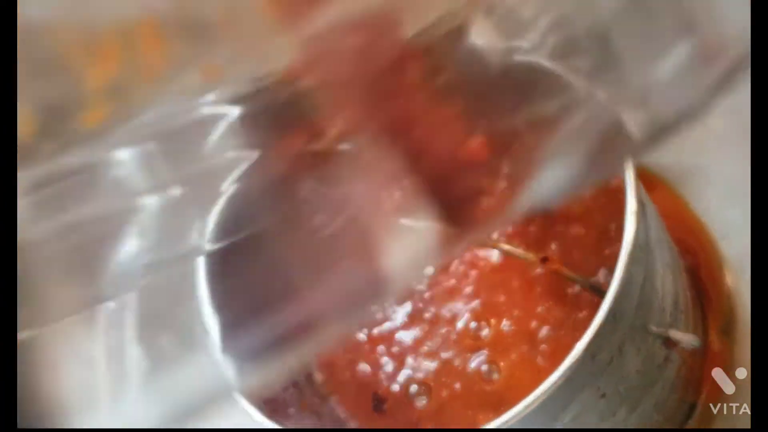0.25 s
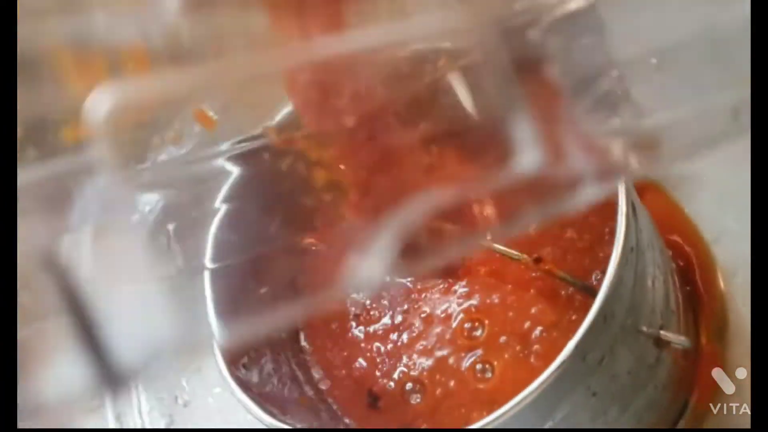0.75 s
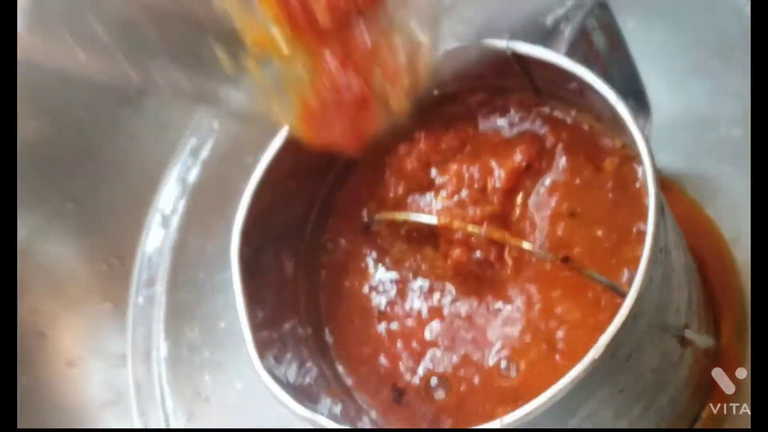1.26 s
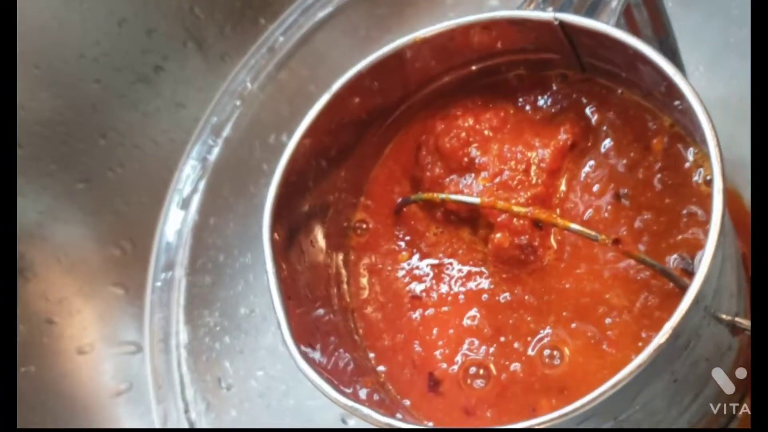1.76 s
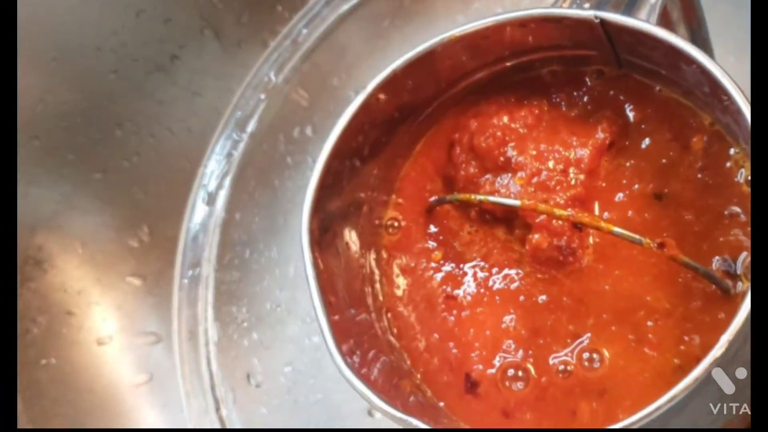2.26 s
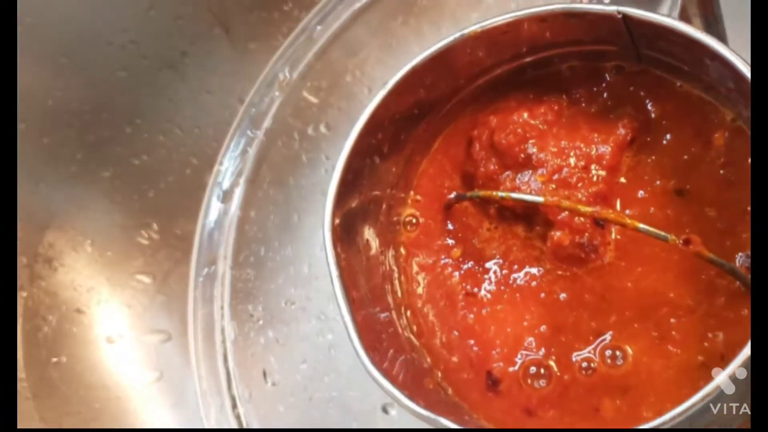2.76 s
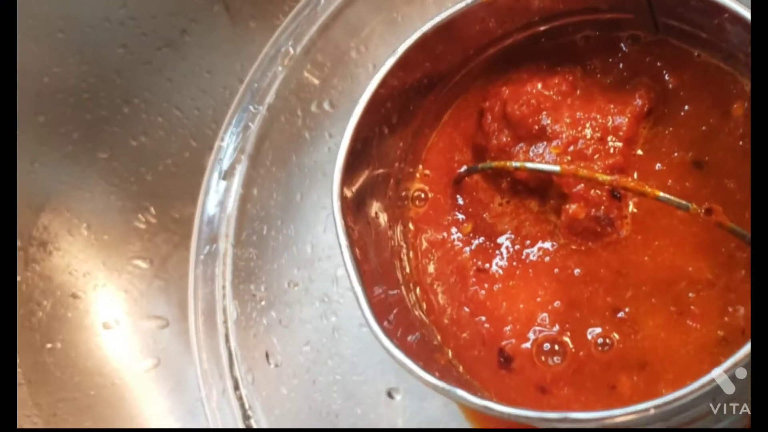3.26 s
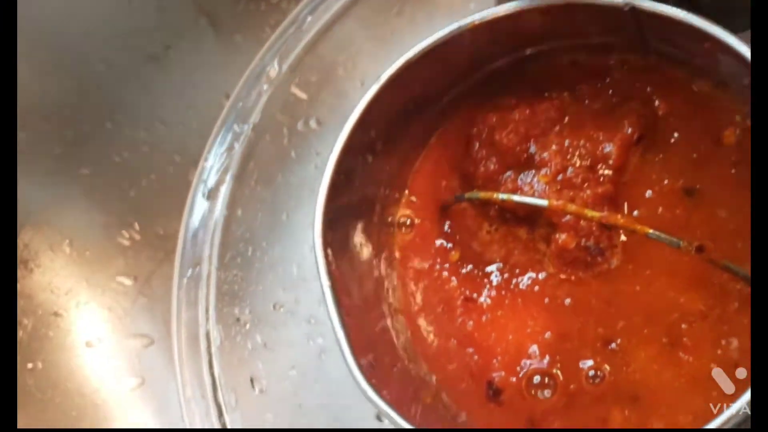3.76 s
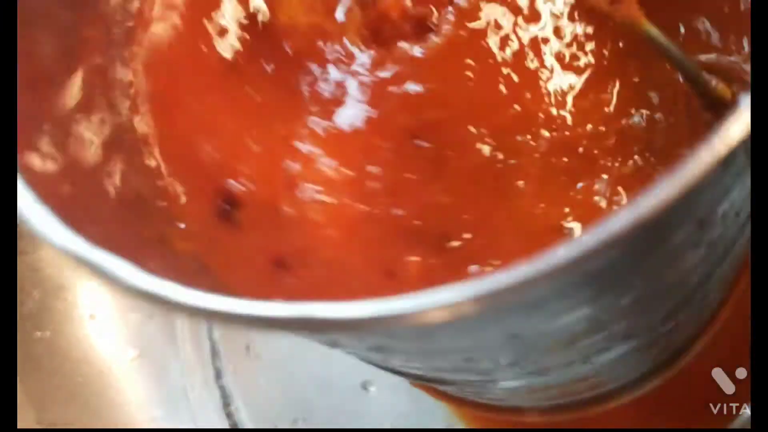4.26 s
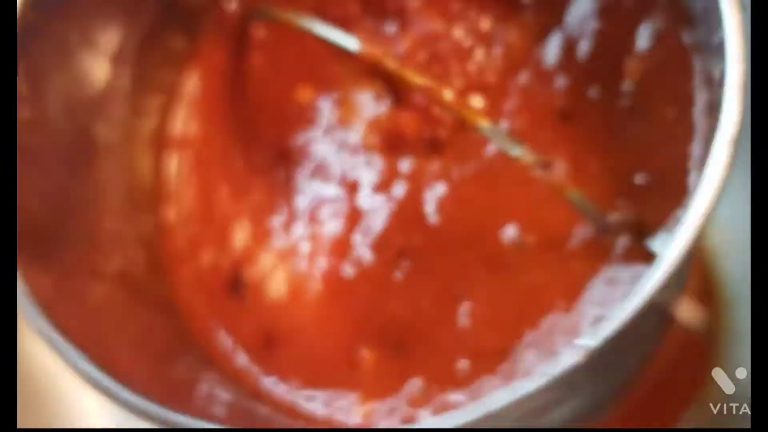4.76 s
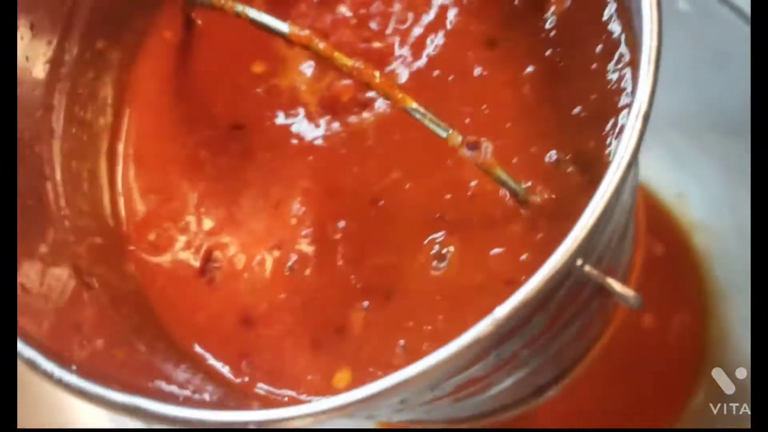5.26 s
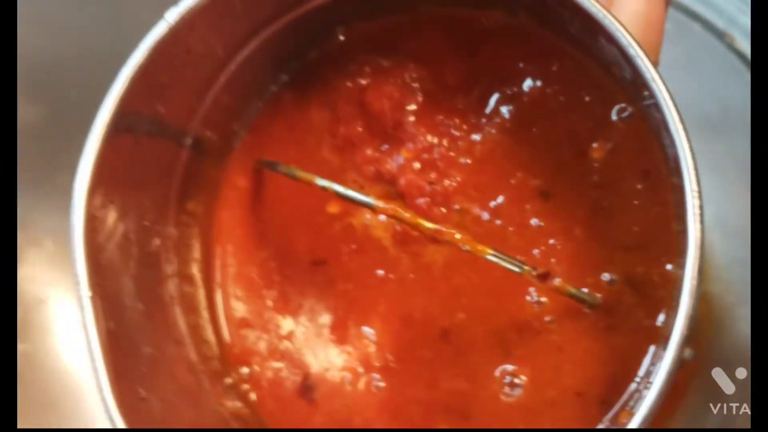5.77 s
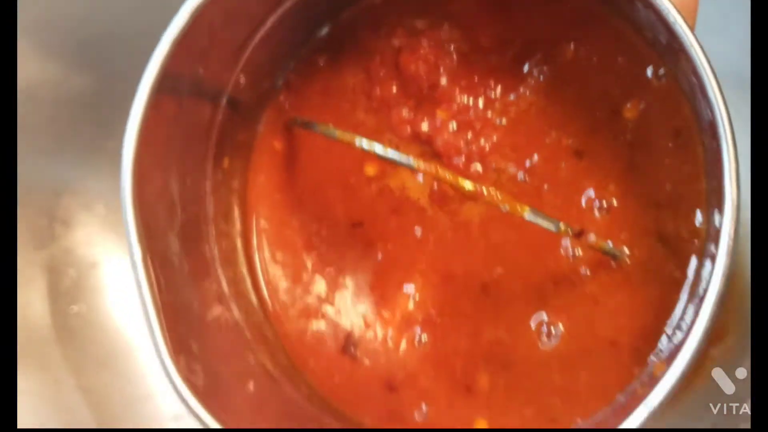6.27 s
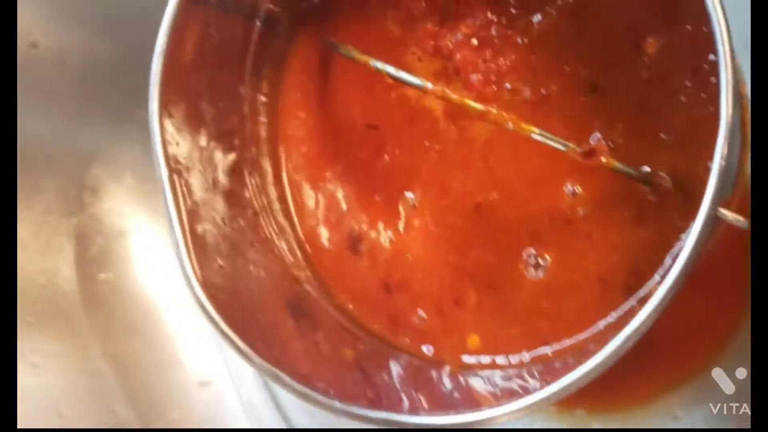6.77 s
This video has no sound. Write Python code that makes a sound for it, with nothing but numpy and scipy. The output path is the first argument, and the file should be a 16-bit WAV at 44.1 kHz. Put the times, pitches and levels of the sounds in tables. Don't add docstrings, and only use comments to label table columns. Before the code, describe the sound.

In a humming kitchen, lumps of puree slosh, a jar bangs and rocks in a steel sink, then a lifted sifter clinks and drips.

```python
import sys
import numpy as np
from scipy import signal
from scipy.fft import rfft, irfft
from scipy.io import wavfile
from scipy.ndimage import uniform_filter1d

SR = 44100
rng = np.random.default_rng(int(sys.argv[2]) if len(sys.argv) > 2 else 0)


def elevation(decibels):
    levels = np.asarray(decibels, float)
    return 10 ** (levels / 20)


def persist_wave(psi):
    counts = np.round(np.clip(psi, -1, 1) * 32767).astype(np.int16)
    wavfile.write(sys.argv[1], SR, np.atleast_2d(counts).T)


N = 309449


def evened(x):
    return x / np.sqrt(np.mean(x ** 2) + 1e-20)


def smooth_noise(shape, size):
    return evened(uniform_filter1d(rng.standard_normal(shape), size=size))


def read(points, hz):
    f, value = np.transpose(points)
    return np.interp(np.log(hz + 1), np.log(f + 1), value)


def add(mix, s, sound):
    part = mix[..., round(s * SR):][..., :sound.shape[-1]]
    part += sound[..., :part.shape[-1]]


def coloured(x, points):
    gain = elevation(read(points, np.fft.rfftfreq(x.shape[-1], 1 / SR)))
    return irfft(rfft(x) * gain, x.shape[-1])


def ring(hz, t60, rise, size):
    t = np.arange(size) / SR
    fade = elevation(-60 * t / max(t60, .004))
    return np.sin(2 * np.pi * hz * t) * fade * (1 - np.exp(-t / rise))


def wander(per_s):
    t = np.arange(0, N + 256, 256) / SR
    rates = np.geomspace(.3, 1, num=12) * per_s
    slow = sum(np.sin(2 * np.pi * (f * t + rng.random())) / np.sqrt(f) for f in rates)
    return evened(np.interp(np.arange(N) / SR, t, slow))


def patches(shape, size):
    over_pitch = uniform_filter1d(rng.standard_normal(shape), size=5, axis=0)
    return evened(uniform_filter1d(over_pitch, size=size, axis=1))


def mottled(x, patchy_db):
    z = signal.stft(x, nperseg=256, noverlap=192)[2]
    z = z * elevation(patchy_db * patches(z.shape, size=12))
    return signal.istft(z, nperseg=256, noverlap=192)[1][:N]


# f/Hz, likeness [0 to 1]
PORT_LIKENESS = [(60, 0.98), (130, 0.99), (290, 0.93), (640, 0.61), (1410, 0.048), (3100, 0.035),
                 (6820, 0.1), (15000, 0.61)]
# f/Hz, level/dB
PORT_LEAN = [(60, 1.5), (180, -0.2), (550, -0.8), (1650, 0.35), (4970, -0.1), (15000, 3)]


def ports(x):
    hz, _, z = signal.stft(x, SR, nperseg=256, noverlap=192)
    same = np.clip(read(PORT_LIKENESS, hz), 0, 1)[:, None]
    lean = elevation(read(PORT_LEAN, hz) / 2)[:, None]
    scatter = 1.36 * np.tanh(2.4 * patches(z.shape, size=30))
    side = 1j * np.sqrt((1 - same) / (1 + same)) * scatter
    both = z * np.array([lean * (1 + side), (1 - side) / lean])
    return signal.istft(both, nperseg=256, noverlap=192)[1][:, :N]


def diffuse(colour_db, patchy_db, size=2048):
    frames, hz = 4 * N // size + 5, np.fft.rfftfreq(size, 1 / SR)
    a, b, c, d, drift = rng.standard_normal((frames, len(hz), 5)).T
    drift = evened(uniform_filter1d(uniform_filter1d(drift, size=9, axis=0), size=8, axis=1))
    same = np.clip(read(PORT_LIKENESS, hz), 0, 1)[:, None]
    left = a + 1j * b
    right = same * left + np.sqrt(1 - same ** 2) * (c + 1j * d)
    z = np.array([left * elevation(read(PORT_LEAN, hz))[:, None], right])
    z = z * elevation(colour_db(hz)[:, None] + patchy_db * drift)
    return evened(signal.istft(z, nperseg=size, noverlap=3 * size // 4)[1][:, :N])


# f/Hz, t60/s
ECHO_TIMES = [(100, 0.13), (1000, 0.45), (4000, 0.16), (12000, 0.13)]


def room(x):
    taps = np.zeros((2, SR // 2))
    at = np.arange(100, SR // 2 - 20, 20)
    at = at + rng.integers(0, 20, (2, len(at)))
    np.put_along_axis(taps, at, rng.choice([-1., 1.], at.shape), 1)
    hz, t, z = signal.stft(taps, SR, nperseg=256)
    tail = signal.istft(z * elevation(-60 * t / read(ECHO_TIMES, hz)[:, None]), SR, nperseg=256)[1]
    return signal.fftconvolve(x[None], tail / np.linalg.norm(tail[0]), axes=1)[:, :N]


# t/s, level/dB
DRONE_LEVEL = [(0, -38.5), (.92, -40.5), (1.64, -43), (2.7, -42), (3.62, -45.5), (4.1, -45), (5.02, -45),
               (5.6, -41.5), (6.2, -39), (6.75, -37), (7.02, -38.5)]


def drone_level():
    return np.interp(np.arange(N) / SR, *np.transpose(DRONE_LEVEL))


# f/Hz, level/dB
DRONE_COLOUR = [(15, -42), (25, -18), (40, -40), (58, -7.5), (124, -4), (188, -5.5), (237, -5),
                (392, -13.5), (429, -2), (579, -7), (649, -8), (1410, -16), (2040, -15.5), (2400, -24.5),
                (6000, -36), (7800, -33), (13200, -120)]
# f/Hz, width/Hz, level/dB
ROOM_PEAKS = [(58.3, 26.6, 11.5), (136.6, 50, 7.5), (235.4, 13, 8), (363, 120, -0.5), (437.4, 21.3, 8),
              (499.2, 11, 5.5), (657, 61, 6), (825, 180, -7.5), (972, 380, 5.5), (1290, 27, -6),
              (1499, 30, 6.5)]


def drone(level_db, swell_db):
    t = np.arange(N) / SR

    def colour_db(hz):
        humps = sum(db / (1 + (2 * (hz - f) / width) ** 2) for f, width, db in ROOM_PEAKS)
        return read(DRONE_COLOUR, hz) + humps

    noise = diffuse(colour_db, patchy_db=1.5)
    rumble = signal.sosfiltfilt(signal.butter(2, 160, fs=SR, output="sos"), noise)
    middle = signal.sosfiltfilt(signal.butter(2, [600, 950], "band", fs=SR, output="sos"), noise)
    rumble_db = -0.7 + 0.11 * swell_db + 0.4 * wander(2.2)
    middle_db = -1.0 - 0.23 * swell_db
    out = elevation(level_db) * (noise + (elevation(rumble_db) - 1) * rumble + (elevation(middle_db) - 1) * middle)
    deep = signal.sosfiltfilt(signal.butter(3, 51.6, fs=SR, output="sos"), out)
    deep_db = -7 + 2.5 * abs(t - 1.6)
    return out + (elevation(deep_db) - 1) * deep


# f/Hz, level/dB
HISS_COLOUR = [(1470, -23), (2500, 3.5), (3800, -1), (4140, 1.5), (7030, -11.5), (12300, -8.5),
               (14500, -9.5), (16100, -15), (16500, -42)]


def hiss(swell_db):
    level_db = -56.5 + 0.47 * swell_db + 0.46 * wander(1.99)
    return elevation(level_db) * diffuse(lambda hz: read(HISS_COLOUR, hz), patchy_db=3.0, size=1024)


# f/Hz, width/Hz, level/dB
APPLIANCE = (670, 250, -59)


def appliance():
    centre_hz, width_hz, db = APPLIANCE
    level_db = db + 4.5 - 1.3 * np.arange(N) / SR

    def colour_db(hz):
        return -30 * np.log10(1 + (2 * (hz - centre_hz) / width_hz) ** 2)

    return elevation(level_db) * diffuse(colour_db, patchy_db=3.0)


# f/Hz, level/dB
MOTOR_TONES = [(2005, -60.5), (2490, -74.5), (4000, -84)]


def whine():
    out = np.zeros((2, N))
    for hz, db in MOTOR_TONES:
        drift, swell = smooth_noise((1, N), 2500)[0], smooth_noise((1, N), 2500)[0]
        turn = 2 * np.pi * np.cumsum(hz * (1 + 0.0006 * drift)) / SR
        out += elevation(db + 3.5 + 2.5 * swell) * np.sin(turn + np.array([[0], [1.4]]))
    return out


def kitchen():
    level_db = drone_level()
    swell_db = level_db - level_db.mean()
    return drone(level_db, swell_db) + hiss(swell_db) + appliance() + whine()


# t/s, body level/dB, body t60/s, fizz level/dB, fizz t60/s
LUMPS = [(0, -43.5, 0.68, -55.5, 1), (0.287, -62, .1, -51, 0.11), (0.3069, -43.5, 0.28, -39, 0.68),
         (.322, -59, 0.69, -43.5, 0.97), (0.41, -43, 0.21, -59, 0.21), (.526, -39, 0.064, -35, 0.035),
         (0.835, -54, 0.78, -37.5, 0.7), (0.91, -46, 0.95, -46.5, 0.3), (1.036, -39.5, 0.97, -42.5, 0.58),
         (1.065, -37.5, 0.47, -45.5, 0.56), (2.75, -40.5, 0.4, -49, 0.28), (2.829, -44, 0.7, -56, 0.5),
         (2.862, -27, 0.24, -40.5, 0.37), (2.906, -48, 0.18, -47, .25), (2.96, -37, 0.37, -45, 0.34),
         (3.6, -74, .5, -66, 1)]
# f/Hz, level/dB
BODY_COLOUR = [(180, -21), (300, -5), (364, -4.5), (441, -9.5), (605, -10), (684, -5.5), (1650, -10),
               (4620, -16), (8000, -37), (10400, -70), (17600, -120)]
FIZZ_COLOUR = [(2060, -3.5), (3500, -3.5), (4600, -1.5), (7570, -7), (8190, -19), (12300, -11),
               (15700, -18), (16200, -32), (16500, -46)]


def slosh():
    out, t = np.zeros(N), np.arange(20000) / SR
    top_hz, top_drain = 7000, 0.58
    for s, body_db, body_t60, fizz_db, fizz_t60 in LUMPS:
        noise = rng.standard_normal((2, len(t))) * elevation(0.7 * smooth_noise((2, len(t)), 120))
        body = evened(coloured(noise[0], BODY_COLOUR)) * elevation(body_db - 60 * t / body_t60)
        fizz = evened(coloured(noise[1], FIZZ_COLOUR))
        top = coloured(fizz, [(1.1 * top_hz, -40), (1.11 * top_hz, 0)])
        lower = (fizz - top) * elevation(fizz_db - 60 * t / fizz_t60)
        top = top * elevation(fizz_db + 7.0 - 60 * t / (top_drain * fizz_t60))
        add(out, s, body * (1 - np.exp(-t / 0.001)) + (lower + top) * (1 - np.exp(-t / 0.0018)))
    return out


# t/s, level/dB, f/Hz, length [cycles]
FINGER_BUMPS = [
    (.034, 1, 104, 1.93),
    (.4225, -14, 60, 2.3),
    (.275, -23, 51, 2.1),
]


def bumps():
    out = np.zeros((2, N))
    for s, db, hz, cycles in FINGER_BUMPS:
        u = np.arange(0, cycles, hz / SR)
        push = np.sin(2 * np.pi * u) * (u / cycles) * np.exp(1 - 2.75 * u) * np.e
        add(out, s, -elevation(db) * push * elevation([[0], [-20]]))
    return out


# t/s, level/dB, f/Hz, snap level/dB
DRIPS = [(1.231, -52, 2780, -50), (3.0354, -41, 2160, -53), (4.063, -57, 3030, -54),
         (4.078, -50, 2150, -53), (4.099, -49, 2720, -57), (4.141, -57, 2600, -55), (4.372, -45, 2780, -56),
         (4.501, -39.5, 2370, -58), (4.5604, -52, 2740, -62), (4.569, -34.5, 2810, -56),
         (4.714, -34, 2590, -62), (4.798, -44.5, 3840, -59), (5.0417, -54, 2570, -73),
         (5.09, -39.5, 3000, -56), (5.1406, -24, 2950, -56), (5.306, -42.5, 2690, -63),
         (5.3493, -37, 2890, -63), (6.591, -40, 2850, -87), (6.6027, -33, 2210, -65),
         (6.6716, -43, 2240, -59), (6.698, -41, 3050, -56), (6.704, -41, 2540, -61),
         (6.737, -48, 2470, -56)]
# t/s, level/dB, f/Hz, snap level/dB
TINKS = [(3.5602, -53, 4620, -57), (3.979, -48.5, 3950, -62), (4.371, -43, 4130, -57),
         (4.4806, -53, 4700, -55), (4.5214, -49, 4700, -50), (4.5265, -41.5, 4680, -47),
         (4.631, -34.5, 4600, -50), (4.658, -50, 5670, -46), (4.757, -49, 7300, -63),
         (4.897, -46, 5940, -59), (5.1414, -45, 4260, -66), (5.2456, -48, 6400, -66),
         (5.306, -47.5, 4470, -64), (6.018, -39.5, 7250, -71), (6.0268, -46, 7530, -70),
         (6.535, -54, 8400, -56), (6.7585, -56, 7200, -41.5)]
# t/s, level/dB
SNAPS = [(0.305, -41.5), (.8385, -61), (2.954, -40), (3.863, -50), (1.931, -50), (3.8042, -56),
         (3.8792, -34), (4.294, -50), (4.3037, -64), (4.364, -54), (4.596, -45.5), (4.6414, -57),
         (4.679, -53), (4.7786, -58), (4.8178, -56), (5.028, -56), (5.3354, -53.5), (6.798, -59)]


def tick_rows():
    def wall():
        return rng.uniform(2264, 3220)

    def rim():
        return rng.uniform(4150, 4700)

    drips = [(s, db, hz, rim(), db - 28, snap_db) for s, db, hz, snap_db in DRIPS]
    tinks = [(s, db - 11, wall(), hz, db, snap_db) for s, db, hz, snap_db in TINKS]
    snaps = [(s, db + 1, wall(), rim(), db - 17.5, db) for s, db in SNAPS]
    return drips + tinks + snaps


def ticks():
    out, t = np.zeros(N), np.arange(3000) / SR

    def pair(hz, apart, t60):
        step = 1 + 0.09 * apart
        first = ring(hz, t60, rise=0.0028, size=len(t))
        return first + 0.99 * ring(hz * step, 0.78 * t60, rise=0.00078, size=len(t))

    for s, wall_db, wall_hz, rim_hz, rim_db, snap_db in tick_rows():
        rough = 1 + 0.24 * smooth_noise((2, len(t)), 14)
        apart = rng.uniform(-0.85, 1, 2)
        wall = elevation(wall_db - 0.5) * rough[0] * pair(wall_hz, apart[0], 0.037)
        rim = elevation(rim_db + 5.0) * rough[1] * pair(rim_hz, apart[1], 0.035)
        colour = [(4000, -22), (7000, -10.0), (10500, -5 - 8 * abs(apart[0])), (12000, -2.5), (16000, -8.5)]
        snap = evened(coloured(rng.standard_normal(len(t)), colour))
        add(out, s, wall + rim + snap * elevation(snap_db + 5.0 - 60 * t / 0.048))
    return out


# t/s, level/dB
PRICKS = [(4.487, -52), (4.561, -48), (4.5935, -33), (4.6315, -44), (4.643, -52), (4.666, -50),
          (4.6815, -41), (4.69, -46), (4.775, -61), (4.781, -53), (6.699, -44), (6.707, -44), (6.721, -55),
          (6.738, -35), (6.756, -33), (2.9537, -29), (.8395, -56), (.307, -44), (.325, -44)]


def pricks():
    out, t = np.zeros(N), np.arange(3000) / SR
    for s, db in PRICKS:
        noise = rng.standard_normal(len(t))
        prick = evened(coloured(noise, [(8000, -30), (11000, -6), (12500, 4), (16000, -6)]))
        add(out, s, prick * elevation(db - 60 * t / 0.025))
    return out


# t/s, level/dB, f/Hz, t60/s
BLADE_HIT = (.335, -45, 7770, .5)


def blade():
    out = np.zeros(N)
    s, db, hz, t60 = BLADE_HIT
    uneven = 1 + .5 * smooth_noise(14000, 200)
    add(out, s, elevation(db) * ring(hz, t60, rise=0.0075, size=14000) * uneven)
    return out


# t/s, jar level at 1.2-2 kHz/dB, then against it
# level below/dB, level at 2-3 kHz/dB, level above with the treble noise/dB
CONTACTS = [(1.2929, -15, -17, -7, -9.5), (1.3102, -31.5, 1, -10, -10), (2.7455, -30, 0, -1, 2.5),
            (2.7496, -27.5, 1, -7, 1), (2.7606, -39.5, 12, 9.5, -8), (2.8583, -17, -2.5, -6, -5),
            (2.8618, -25, -1, -7, -3), (2.8654, -26, 8, -4, -8), (2.87, -28, 8, -6, -6),
            (2.876, -43, 3, -3, -3), (2.8975, -33, -2, -13, -2), (2.912, -29.5, 12, -27, -10),
            (2.953, -24, 5, -0.5, -18), (2.9994, -37.5, 15, -14, -11), (3.1263, -34.5, 3, -6, -9),
            (3.8772, -25.5, 3.5, -6.5, -14)]
# f/Hz, level/dB, t60/s
JAR_MODES = [(488, -5, 0.13), (717, 7, 0.023), (1015, -6, 0.072), (1425, 5, 0.017), (1515, 6.5, 0.026),
             (1608, -2.5, 0.03), (1800, 1, 0.027), (2240, 11, 0.0085), (2480, 10.5, 0.014),
             (2850, 1.5, 0.025), (3206, 1, 0.038), (3805, 0.5, 0.035), (4070, 1.5, 0.035), (4700, 0, 0.045),
             (4700, -28, 0.032)]


def cracks():
    out, t = np.zeros(N), np.arange(6000) / SR
    for s, db, low_db, upper_db, high_db in CONTACTS:
        groups_db = low_db, 0, upper_db, high_db
        modes = np.zeros(len(t))
        for hz, mode_db, t60 in JAR_MODES:
            a, b = rng.standard_normal(2)
            group = (hz > 1200) + (hz > 2000) + (hz > 3000)
            tone = ring(hz * (1 + 0.027 * b), t60, rise=0.001, size=len(t))
            late = int(0.0015 * SR * abs(a))
            modes += elevation(mode_db + groups_db[group] + 0.28 * a) * np.sign(b) * np.roll(tone, late)
        modes *= 1 + 0.57 * smooth_noise(len(t), 60)
        balance = [(200, low_db - 30), (450, low_db), (1000, low_db), (1450, -1.0), (1900, -4.0),
                   (2200, upper_db - 19.0), (2900, upper_db - 26.0),
                   (3300, high_db + 6.5), (5500, high_db - 4), (8000, high_db - 28)]
        contact = coloured(rng.standard_normal(len(t)), balance) * elevation(1.0 - 60 * t / 0.037)
        bright = [(4000, -38), (5500, -2.0), (9000, -6.0), (12000, -1.0), (16300, -1.5)]
        treble = evened(coloured(rng.standard_normal(len(t)), bright)) * elevation(high_db - 0.5 - 60 * t / 0.036)
        add(out, s, elevation(db) * (elevation(-6.0) * modes + contact + treble) * (1 - np.exp(-t / 0.0015)))
    return out


# t/s, level of the middle mode/dB, low modes against it/dB, high modes/dB, damping [factor]
BLOWS = [(1.2931, -11, -8, -39, 1.33), (1.314, -13.5, -7.5, -5.5, 2.6), (1.357, -39, 0.5, -9.5, 1.3),
         (1.394, -35.5, -5, -0.5, 1.03), (2.756, -25, 7.5, -12, 0.56), (2.857, -24, 18, 1, 2.2),
         (2.897, -29, 15, 0.5, 0.45), (2.954, -9, 1, -3.5, 0.94), (2.959, -28, 26.5, -2, 0.73),
         (3.025, -22, 11.5, -11, 0.99)]
# t/s, level/dB, damping [factor]
ROCKS = [
    (3.132, -19, 0.88),
    (3.198, -32, 0.55),
    (3.243, -22, 1),
    (3.304, -23.5, 1.9),
]
# f/Hz, t60/s
SINK_MODES = [(82, 0.22), (106, 0.079), (146, 0.19), (213, 0.17), (330, 0.35)]


def sink():
    out = np.zeros(N)
    rocks = [(s, db, -2, -16.5, damping) for s, db, damping in ROCKS]
    for s, db, low_db, high_db, damping in BLOWS + rocks:
        detune = 1 + .015 * rng.standard_normal(len(SINK_MODES))
        modes_db = low_db - 21.5, low_db - 5.5, 0, high_db, high_db - 21.0
        for (hz, t60), mode_db, d in zip(SINK_MODES, modes_db, detune):
            boom = ring(hz * d, t60 / damping, rise=0.0042, size=16000)
            add(out, s, -elevation(db + mode_db + 5.0) * boom)
    return out


# t/s, level/dB, f/Hz, t60/s
PINGS = [(1.2935, -35, 1620, .09), (1.2935, -18.5, 1850, 0.032), (2.9535, -11.5, 1520, 0.03),
         (2.9535, -14, 2340, 0.024), (2.955, -17, 2780, 0.019), (2.9545, -20, 1950, .02),
         (2.96, -30, 4700, .05), (2.762, -28, 2450, .05), (2.752, -27.5, 772, 0.072),
         (2.862, -22, 800, .06), (2.911, -24.5, 750, .1), (2.868, -30, 4100, .07),
         (5.142, -41, 4200, 0.089), (5.35, -41.5, 2800, 0.055), (4.576, -42.5, 3150, .08),
         (2.958, -26, 950, .04), (2.87, -23, 1020, 0.073), (6.021, -46, 2250, .04), (6.389, -45, 2700, .08),
         (6.389, -45.5, 3050, 0.093), (6.5915, -33, 3050, .09), (6.523, -45, 3050, .06),
         (5.349, -43, 4450, .05), (1.308, -30, 1600, .05), (2.965, -27, 620, .1), (2.982, -30, 1350, .06),
         (4.501, -43, 3000, .08), (4.64, -44, 3300, .05), (6.674, -41, 1640, 0.093), (6.7, -42, 4700, .04),
         (6.722, -46, 2900, 0.074), (6.735, -43, 1750, .08), (6.745, -46, 2050, .12)]


def pings():
    out = np.zeros(N)
    for s, db, hz, t60 in PINGS:
        rough = 1 + 0.46 * smooth_noise(5000, 60)
        add(out, s, elevation(db) * ring(hz, t60, rise=0.0012, size=5000) * rough)
    return out


# t/s, level/dB, f/Hz, t60/s
THRUMS = [
    (1.2938, -3.5, 81.6, .09),
    (1.357, -19, 167, .12),
    (1.373, -18, 90, .08),
    (2.954, -9, 80, 0.11),
    (5.927, -39, 428, .2),
    (6.086, -39, 431, .15),
    (6.187, -34.5, 439, 0.36),
    (6.275, -39, 433, 0.23),
    (6.319, -35.5, 430, .2),
]


def thrums():
    out = np.zeros(N)
    for s, db, hz, t60 in THRUMS:
        add(out, s, elevation(db) * ring(hz, t60, rise=1.1 / hz, size=12000))
    return out


# t/s, level/dB, centre f/Hz, t60/s
SMACKS = [(1.2945, -35, 4770, 0.047), (1.296, -37, 6400, 0.071), (2.8386, -42, 4240, .08),
          (2.886, -39, 4300, .04), (2.899, -32, 4400, .05), (2.9082, -29, 4720, .07),
          (2.9587, -31, 4700, .07), (2.9995, -31, 4500, 0.04), (3.001, -47, 6240, .03),
          (3.864, -39, 4250, 0.039), (3.9368, -41, 3210, 0.06), (3.9517, -47, 3850, 0.069),
          (4.063, -46, 3370, 0.05), (4.078, -47, 6550, .06), (4.1, -37.5, 3700, 0.034),
          (4.1425, -37, 3260, .035), (4.215, -45, 3580, 0.074), (4.295, -51, 7000, .07),
          (4.523, -39, 5950, 0.061), (4.572, -35, 5300, 0.031), (4.658, -46, 5770, .04),
          (4.756, -49, 7000, .06), (4.7555, -43, 5000, 0.056), (5.04, -40, 1890, 0.046),
          (5.04, -46, 4200, .03), (5.135, -46, 4650, .04), (5.141, -46, 2520, .03), (5.159, -44, 2910, .05),
          (5.207, -45, 6450, .03), (5.349, -48, 4420, .04), (5.35, -42, 3200, .04), (4.574, -42, 3160, .05),
          (4.718, -45, 3170, .05), (2.9546, -30, 2650, 0.038), (6.021, -49, 7500, 0.042),
          (6.543, -48, 8500, .03), (6.595, -47, 3030, .09), (6.021, -39, 530, 0.052),
          (6.6723, -40, 1610, 0.04), (6.7, -48, 2000, 0.045), (6.7005, -40, 4530, 0.036),
          (6.72, -44, 3040, 0.055), (6.7595, -41, 7000, 0.046), (6.797, -40.5, 8100, 0.045)]


def smacks():
    out, t = np.zeros(N), np.arange(3000) / SR
    for s, db, hz, t60 in SMACKS:
        pole = np.exp(-2 * np.pi * 0.093 * hz / SR)
        slow = signal.lfilter([1], [1, -pole], rng.standard_normal((2, len(t))))
        puff = evened(slow[0] * np.cos(2 * np.pi * hz * t) + slow[1] * np.sin(2 * np.pi * hz * t))
        add(out, s, puff * elevation(db - 5.5 - 60 * t / t60) * (1 - np.exp(-t / 0.00095)))
    return out


# start t/s, end t/s, level/dB
SEEPS = [
    (2.76, 2.955, -54),
    (2.95, 3.042, -50),
    (4.48, 4.748, -49.5),
    (6.665, 6.77, -44.5),
]


def seep():
    out, t = np.zeros(N), np.arange(N) / SR
    level = sum(elevation(db) * (t > a) * (t < b) for a, b, db in SEEPS)
    pops = rng.random(N) < 400 / SR
    size = level * elevation(2.0 * np.minimum(rng.exponential(1, N), 2.5)) * pops
    kind = rng.integers(0, 12, N)
    for k, hz in enumerate(np.geomspace(1500, 6500, num=12)):
        pop = ring(hz, 16 / hz, rise=0.00041, size=1200)
        out += signal.oaconvolve(size * (kind == k), pop)[:N]
    return out


# start t/s, end t/s, level/dB, f/Hz
SPRAY = (3.58, 4, -63, 13300)


def spray():
    a, b, db, hz = SPRAY
    band = [(.8 * hz, -40), (0.88 * hz, 0), (1.1 * hz, 0), (1.2 * hz, -30)]
    noise = evened(coloured(rng.standard_normal(N), band))
    progress = np.clip((np.arange(N) / SR - a) / (b - a), 0, 1)
    return noise * elevation(db) * np.sqrt(np.clip(np.sin(np.pi * progress), 0, 1))


# t/s, level/dB
BOWL_TAP = (3.879, -14.5)
# f/Hz, level/dB, t60/s
BOWL_MODES = [(150, -4.5, 0.12), (221, -8.5, 0.17), (239, -1, 0.11), (295, -6.5, 0.13), (385, -5, 0.07),
              (88, -11, 0.11), (506, 1.5, 0.17), (528, -25, 0.4), (558, -20, 0.4), (740, -2.5, 0.04),
              (910, 2.5, 0.018), (1709, -27.5, 0.18), (2620, -23, 0.067), (4540, -20, 0.056),
              (6000, -16, 0.021), (6830, -19, 0.024), (8200, -29, 0.04)]


def clink():
    out = np.zeros(N)
    s, tap_db = BOWL_TAP
    for hz, db, t60 in BOWL_MODES:
        lag = 0.00496 * (hz < 320)
        add(out, s + lag, elevation(tap_db + db) * ring(hz, t60, rise=1.44 / hz, size=20000))
    return out


def scene():
    wet = mottled(slosh(), patchy_db=3.8)
    hard = cracks() + clink()
    small = ticks() + pricks() + blade() + smacks() + seep()
    echo = room(elevation(-7.0) * wet + elevation(-14.5) * hard + elevation(-21.0) * small)
    basin = sink() * elevation([[.4], [-.4]])
    near = ports(wet + hard + small) + ports(pings() + spray())
    return near + basin + echo + bumps() + kitchen() + thrums()


def top_cut(x):
    return signal.sosfilt(signal.butter(12, 16830, fs=SR, output="sos"), x)


def record(dry):
    no_bass = signal.sosfilt(signal.butter(4, 40, "high", fs=SR, output="sos"), dry)
    low_pass = signal.ellip(8, .3, 70, 16000, fs=SR, output="sos")
    mix = signal.sosfilt(low_pass, np.clip(no_bass, -1, 1))
    return top_cut(mix)


dry = scene()
out = record(dry)
persist_wave(out)
```